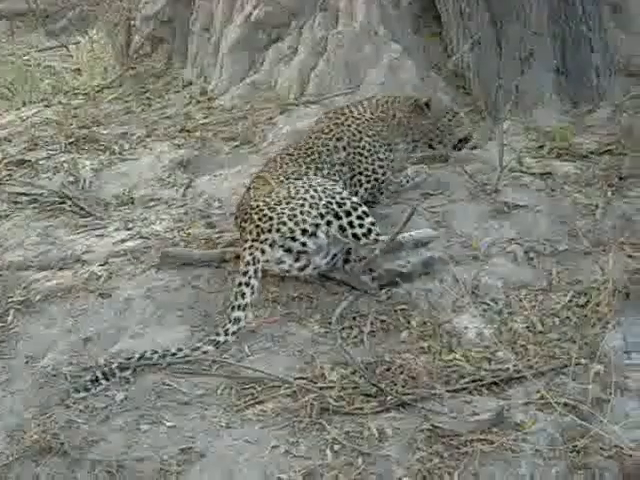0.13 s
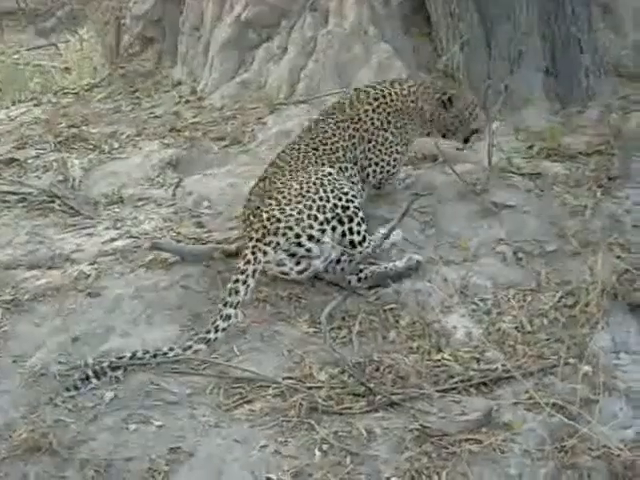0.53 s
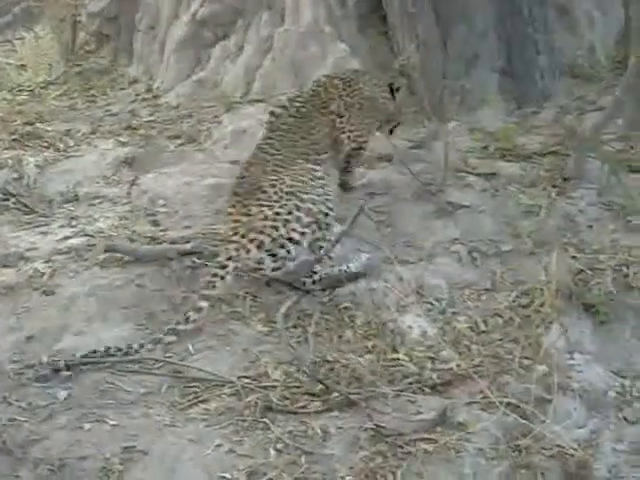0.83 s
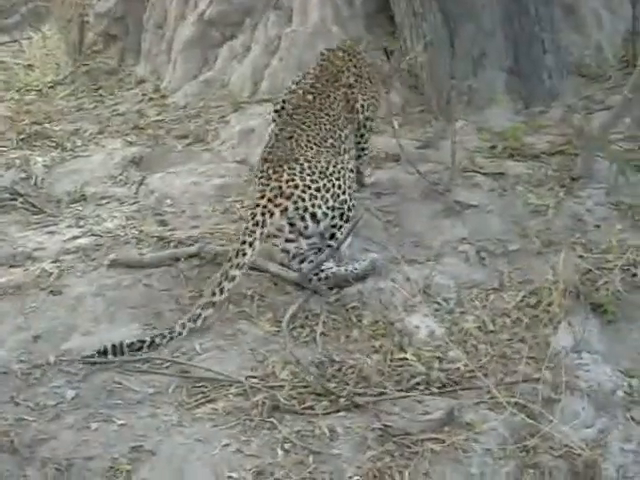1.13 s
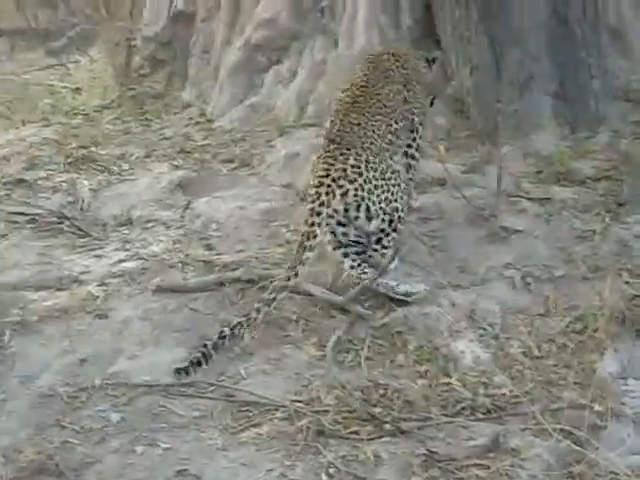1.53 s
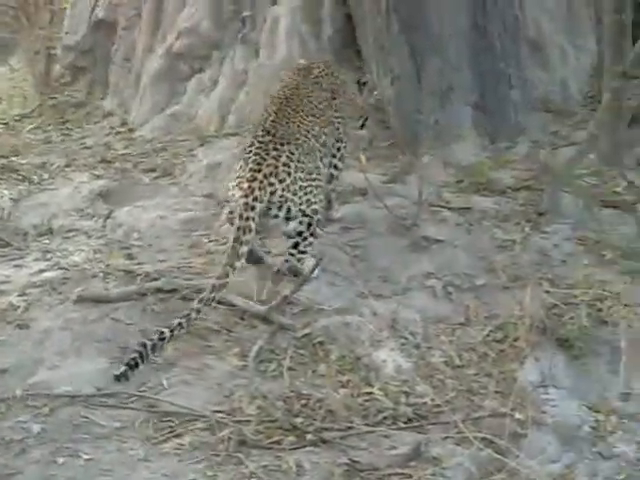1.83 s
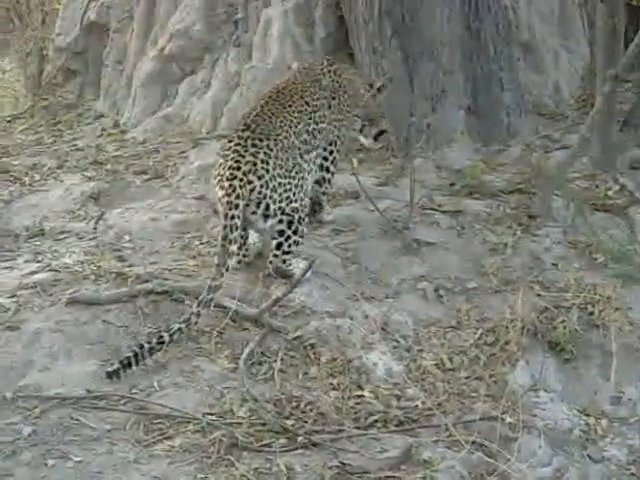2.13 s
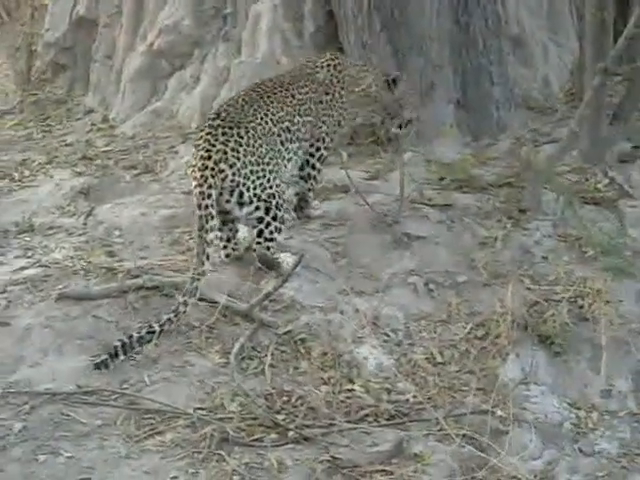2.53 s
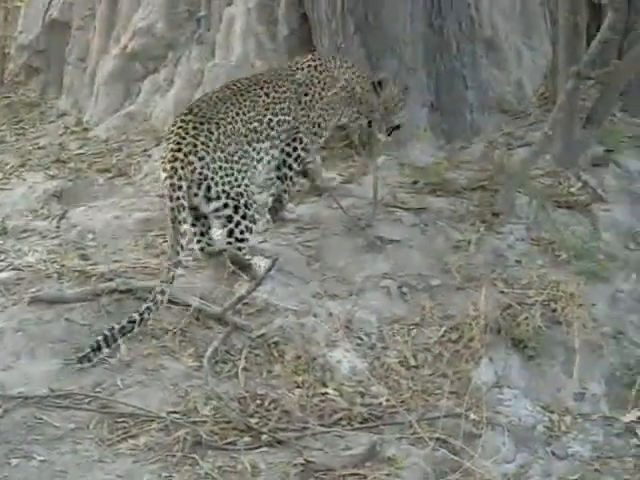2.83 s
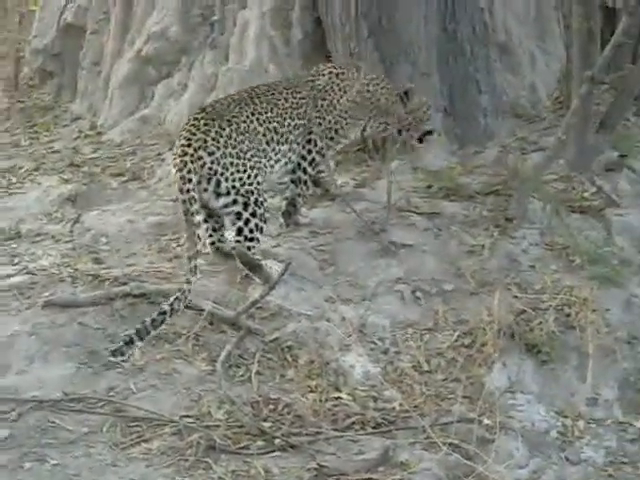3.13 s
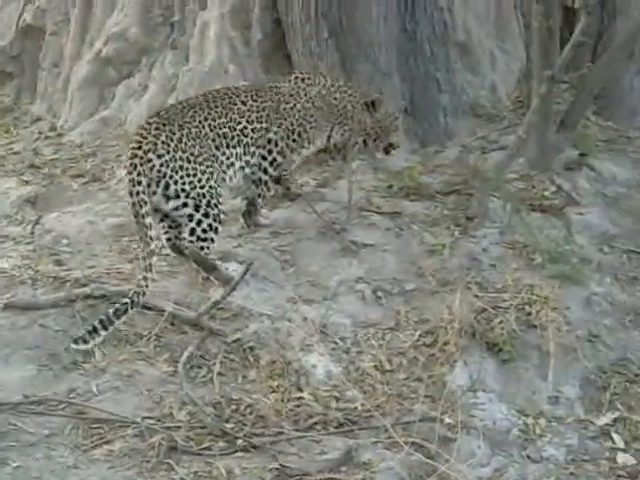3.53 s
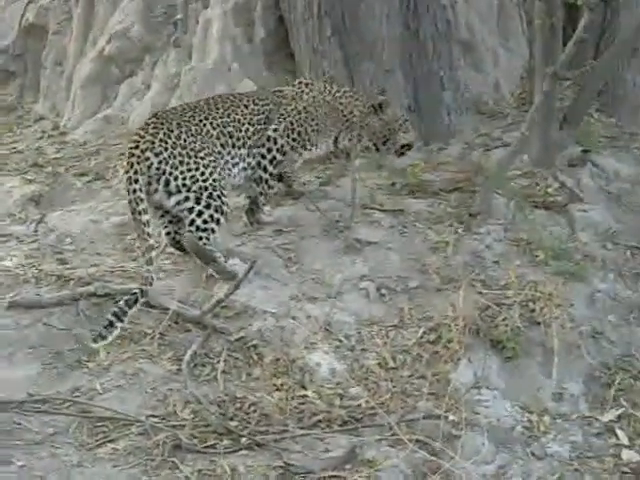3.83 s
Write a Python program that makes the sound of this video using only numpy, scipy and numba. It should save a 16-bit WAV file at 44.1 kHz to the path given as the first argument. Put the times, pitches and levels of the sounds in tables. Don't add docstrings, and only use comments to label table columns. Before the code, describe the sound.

After a brief near-silence the leopard's call cuts in midway, then deep pulsing rasps saw out and in steadily, with slight ground echo and faint bush hiss, through a muffled, overloaded microphone.

```python
import sys
import numpy as np
from scipy import signal
from scipy.io import wavfile
from numba import njit

SR = 44100
rng = np.random.default_rng(int(sys.argv[2]) if len(sys.argv) > 2 else 0)


def digitize_waveform(pressure):
    field = np.atleast_2d(pressure).T
    bounded = np.clip(field, -1, 1)
    quanta = np.round(bounded * 32767).astype(np.int16)
    wavfile.write(sys.argv[1], SR, quanta)


def invert_db(level):
    return 10 ** (np.asarray(level, dtype=float) / 20)


N = 176400
OPEN_S = 0.1385


def level(x, db):
    return x * invert_db(db) / np.sqrt(np.mean(x ** 2))


@njit
def svf(x, hz, width):
    y, band, low = np.empty(len(x)), 0., 0.
    for i in range(len(x)):
        g, k = np.pi * hz[i] / SR, width / hz[i]
        v = (band + g * (x[i] - low)) / (1 + g * (g + k))
        band, low, y[i] = 2 * v - band, low + 2 * g * v, k * v
    return y


def walk(hz):
    return 1.2 * np.interp(np.arange(N) * hz / SR, np.arange(200), rng.standard_normal(200))


def bush():
    one = np.ones(N)
    hiss = svf(rng.standard_normal(N), 1800 * one, 3000.)
    rumble = svf(rng.standard_normal(N), 55 * one, 50.) * invert_db(3.0 * walk(4))
    return level(hiss, -44) + level(rumble, -43.5)


def surroundings(cat):
    echo_s, echo_db, tail_t60_s, tail_db = 0.0108, -11.5, 0.25, -15
    lag = np.arange(SR // 2) / SR
    space = rng.standard_normal(len(lag)) * invert_db(-60 * lag / tail_t60_s) * (lag > .004)
    space *= invert_db(tail_db) / np.sqrt(np.sum(space ** 2))
    space[0] = 1
    space[int(echo_s * SR)] += invert_db(echo_db)
    return signal.fftconvolve(cat, space)[:N]


def tract(x, table, shift=0):
    wobble, wobble_hz, patchy_db, patchy_hz = 0.021, 14, 1.77, 18
    out = 0
    for k, (hz, width, db) in enumerate(table):
        centre = hz * (1 + shift + wobble * walk(wobble_hz))
        gain = (-1) ** k * invert_db(db + patchy_db * walk(patchy_hz))
        once = svf(x, centre, 1.487 * width)
        out = out + gain * svf(once, centre, 1.487 * width)
    return out


def fading(slaps, decay_s, rise_s=0.0013):
    rise, decay = np.exp(-1 / (rise_s * SR)), np.exp(-1 / (decay_s * SR))
    return signal.lfilter([1 - rise], np.convolve([1, -rise], [1, -decay]), slaps)


def breaths(table, attack_s, release_s, first_db, held_db, last_db, sag_db, arc,
            slow_start, slow_end, scatter_s, scatter_db, rebound_db, puff_s):
    first_slap_db, rebound_scatter_s, chest_fall = -5, 0.002, 0.17
    t = np.arange(N) / SR
    slaps, rebounds, gains, shifts = np.zeros(N + SR), np.zeros(N + SR), 0, 0
    for start, length, db, hz, mouth_db, hiss_db in table:
        whole = start > OPEN_S + .05
        at, end = start, start + length
        for late, strong, late2, strong2 in rng.standard_normal(size=(24, 4)):
            if at >= end:
                break
            first = at == start
            slow = slow_start * np.exp(-(at - start) / .03) + slow_end * ((at - start) / length) ** 4.0
            period = (1 + slow) / hz
            slap_at = at + scatter_s * late * (not first)
            slaps[int(slap_at * SR)] += invert_db(scatter_db * strong + first_slap_db * whole * first)
            rebound_at = at + period / 2 + rebound_scatter_s * late2
            rebounds[int(rebound_at * SR)] += invert_db(rebound_db + scatter_db * strong2)
            at += period
        attack = attack_s * whole
        steps_s = [start - .04, .04, attack + 1e-4, max(length - release_s - attack, 1e-4), release_s, .03]
        levels_db = [db - 35, db + first_db * whole, db, db + held_db, db + last_db, db - 71.5]
        effort = np.interp(t, np.cumsum(steps_s), levels_db, -200, -200)
        along = np.clip((t - start) / length, 0, 1)
        inside = np.abs(along - .5) < .5
        bow = arc * (np.sin(np.pi * along) - .6) * inside
        chest_shift = chest_fall * abs(arc) * 20 * (.5 - along) * inside
        shifts = shifts + np.array([chest_shift, bow, bow / 2])
        gains = gains + invert_db(np.array([effort, effort + mouth_db + sag_db * along, effort + hiss_db]))
    puffs = fading((slaps + 0.41 * rebounds)[:N], puff_s)
    return slaps[:N], rebounds[:N], puffs, gains, shifts


def voice(table, style, mix, parts):
    slaps, rebounds, puffs, gains, shifts = breaths(table, **style)
    out = 0
    for part, gain, shift, (slap_db, puff_db, air_db) in zip(parts, gains, shifts, mix):
        unit = np.sqrt(sum(invert_db(2 * db) * width for _, width, db in part))
        drive = invert_db(slap_db) * 30 * (slaps + rebounds * (part is parts[0]))
        drive = drive + invert_db(puff_db) * 2.82 * puffs * rng.standard_normal(N)
        drive = drive + invert_db(air_db + 2.5 * walk(25)) * rng.standard_normal(N)
        out = out + tract(drive * gain, part, shift) * 120 / unit
    return out


# time in seconds, mouth level in dB, chest level in dB.
CATCH_SLAPS = [(0.372, -5.5, -25), (0.438, -6.5, -15), (0.467, -1.5, -21), (0.494, -6, -20.5),
               (0.526, -9, -21), (0.93, -16, -25), (1.024, -12, -14), (1.083, -10.5, -15),
               (1.641, -16, -10), (2.15, -19.5, -17.5), (2.253, -11.5, -11), (2.813, -7.5, -18.5),
               (2.892, -10.5, -14), (2.917, -17, -8), (2.947, -22.5, -15), (3.491, -11.5, -15),
               (3.619, -21.5, -15)]
# centre in Hz, width in Hz, level in dB.
IN_CHEST_MODES = [(55, 29, -15), (95, 50, -9.5), (132, 50, -7.5), (187.6, 48, -0.06), (359.2, 30.3, -11),
                  (458, 90, -22)]
IN_MOUTH_MODES = [(592, 110, -15), (762.4, 54, 0), (996, 56, -6), (1155, 43, -4.5)]
IN_NOSE_MODES = [(1503, 140, -12.5), (1752, 89, -2.5), (2158, 110, -4), (2613, 128, 0.5), (2900, 150, -4.5),
                 (3430, 200, -9.5)]


def catches():
    catch_db, nose_db, puff_s = 6, -14.5, 0.006
    times, mouth_db, chest_db = np.array(CATCH_SLAPS).T
    out = 0
    for db, part in ((mouth_db, IN_MOUTH_MODES), (chest_db - 2, IN_CHEST_MODES),
                     (mouth_db + nose_db, IN_NOSE_MODES)):
        slaps = np.zeros(N)
        slaps[(times * SR).astype(int)] = invert_db(db + catch_db)
        puffs = fading(slaps, puff_s) * rng.standard_normal(N)
        out = out + tract(62 * slaps + 1.8 * puffs, part)
    return out


# first slap in seconds, length in seconds, level in dB, slap rate in Hz,
# mouth level in dB, hiss level in dB.
IN_BREATHS = [
    (.270, .30, -18.5, 34.05, 2, 0),
    (.870, .29, -16.5, 32.01, 2, 2),
    (1.485, 0.29, -15, 31.95, -5.5, .6),
    (2.072, .30, -15, 31, -1.5, -1.3),
    (2.740, 0.28, -15, 33, 2.5, 3),
    (3.378, 0.29, -17, 35, 2.5, 1.5),
]
# slap in dB, puff in dB, steady air in dB.
IN_DRIVE = [(-4.5, -8.5, -8.5), (-16.5, -13.5, -16.5), (-32.5, -18.5, -20.5)]


def in_breaths():
    style = dict(attack_s=0.06, release_s=0.1336, first_db=-8, held_db=2, last_db=-19, sag_db=-2, arc=-0.0256,
                 slow_start=0.08, slow_end=0.08, scatter_s=0.004, scatter_db=1.66, rebound_db=-6.5,
                 puff_s=0.0074)
    return voice(IN_BREATHS, style, IN_DRIVE, (IN_CHEST_MODES, IN_MOUTH_MODES, IN_NOSE_MODES))


# first slap in seconds, length in seconds, level in dB, slap rate in Hz,
# mouth level in dB, hiss level in dB.
OUT_BREATHS = [
    (.140, 0.12, -16, 47.2, 5.5, 4.5),
    (.597, 0.26, -17.5, 54, 10.5, 7.5),
    (1.186, 0.26, -13, 47.5, -1.5, 2.5),
    (1.782, .27, -13, 47.52, -2.5, 3.5),
    (2.399, 0.29, -13, 48.45, 7, 3),
    (3.058, .29, -13, 48.89, 5.5, 3),
    (3.704, 0.3, -15, 48.04, 8.5, 5),
]
# centre in Hz, width in Hz, level in dB.
OUT_CHEST_MODES = [(55, 25, -17), (97.1, 34, -10), (148.8, 53, -7), (208.9, 57.7, 0.5), (367, 47, -18),
                   (481, 90, -20)]
OUT_MOUTH_MODES = [(602, 117, -10.5), (813, 85.3, 0.75), (993.6, 81, -6), (1181, 93, -13)]
OUT_NOSE_MODES = [(1520, 90, -3), (1812, 79, -1), (2098, 160, -3.5), (2356, 152, -0.5), (2660, 144, 0),
                  (2983, 250, -7), (3410, 300, -8)]
# slap in dB, puff in dB, steady air in dB.
OUT_DRIVE = [(-1.5, -4.5, -6.5), (-2, -5.5, -13), (-24, -13, -15.5)]


def out_breaths():
    style = dict(attack_s=0.026, release_s=0.09, first_db=-12, held_db=-3, last_db=-23.5, sag_db=-7.5, arc=0.0885,
                 slow_start=0.28, slow_end=0.2, scatter_s=0.0008, scatter_db=1, rebound_db=-6, puff_s=0.006)
    return voice(OUT_BREATHS, style, OUT_DRIVE, (OUT_CHEST_MODES, OUT_MOUTH_MODES, OUT_NOSE_MODES))


def scene():
    cat = out_breaths() + in_breaths() + catches()
    return (surroundings(cat) + bush())[None]


def roll_off(x):
    return signal.sosfilt(signal.butter(12, 16340, fs=SR, output="sos"), x)


def record(dry):
    overload, clip, gain_db = 0.62, 0.705, 0.01
    lead_in_s, lead_in_db = 0.074, -53
    top_hz, first_rate_hz, image_db = 3720, 8000, -19.5
    t = np.arange(N) / SR
    x = np.clip(dry, -overload, overload) * np.clip((t - OPEN_S) / .001, 0, 1)
    lead_in = invert_db(lead_in_db) * 2.6 * rng.standard_normal(N)
    x = x + lead_in * np.clip((t - lead_in_s) / 0.032, 0, 1) * (t < OPEN_S)
    x = signal.sosfilt(signal.ellip(12, .2, 95, top_hz, fs=SR, output="sos"), x)
    edge = signal.ellip(4, .5, 90, [4300, 4480], "band", fs=SR, output="sos")
    x = x + invert_db(image_db) * signal.sosfilt(edge, x * np.cos(2 * np.pi * first_rate_hz * t))
    return roll_off(np.clip(x * invert_db(gain_db), -clip, clip))


dry = scene()
out = record(dry)
digitize_waveform(out)
```